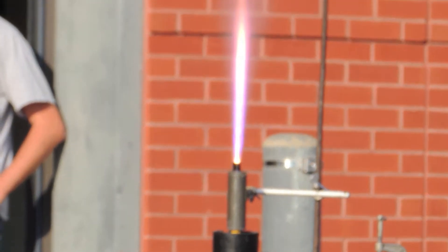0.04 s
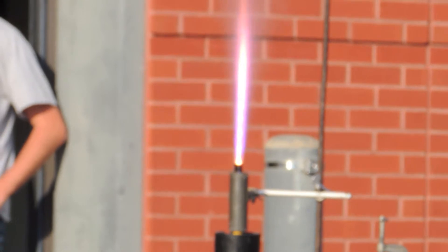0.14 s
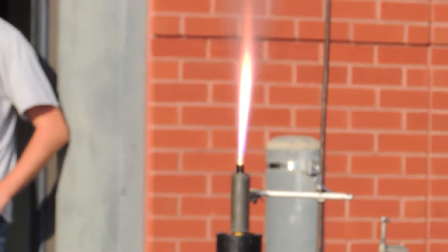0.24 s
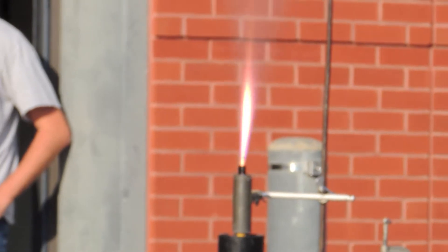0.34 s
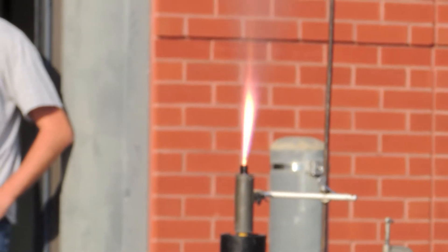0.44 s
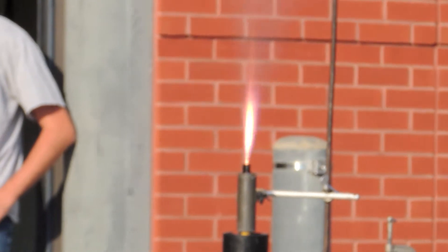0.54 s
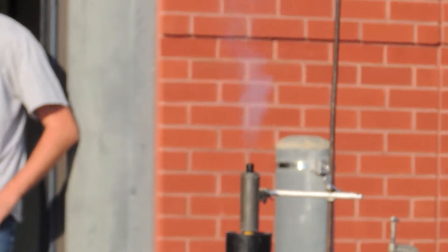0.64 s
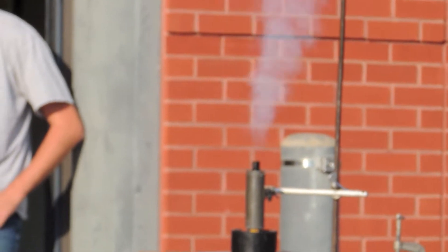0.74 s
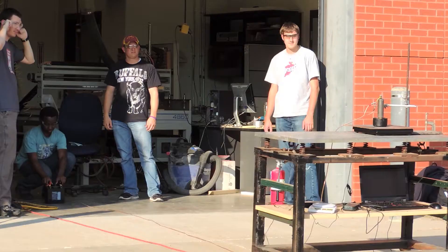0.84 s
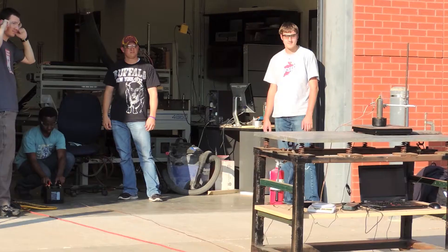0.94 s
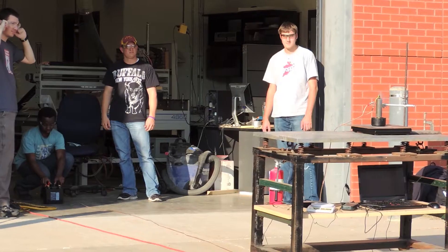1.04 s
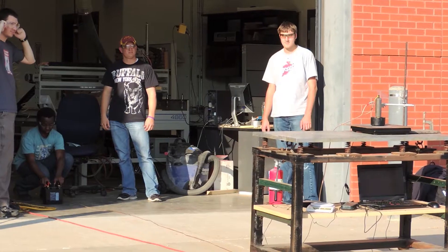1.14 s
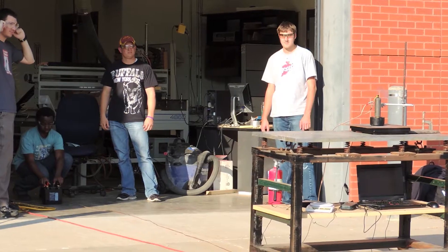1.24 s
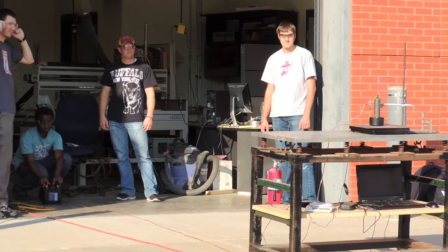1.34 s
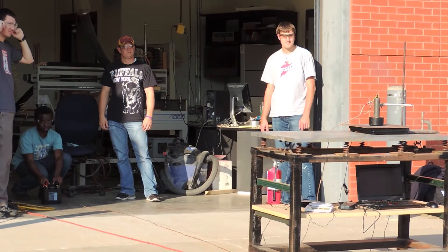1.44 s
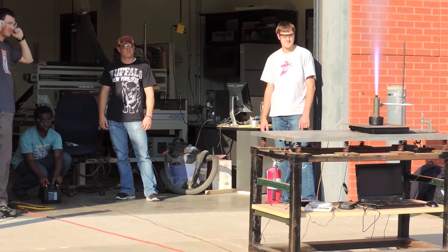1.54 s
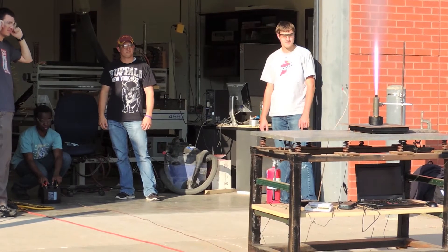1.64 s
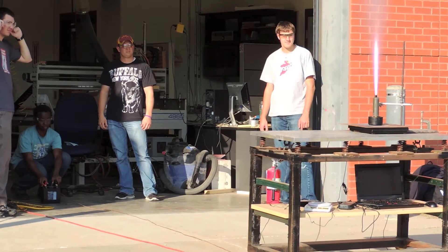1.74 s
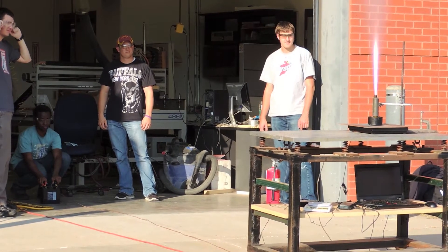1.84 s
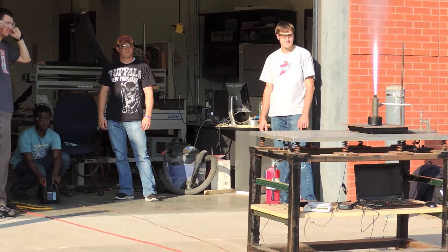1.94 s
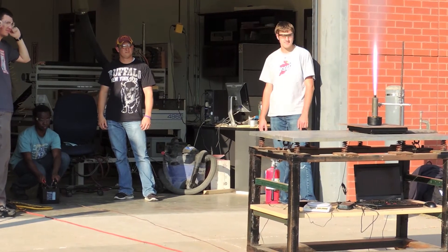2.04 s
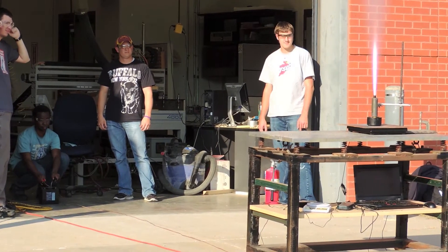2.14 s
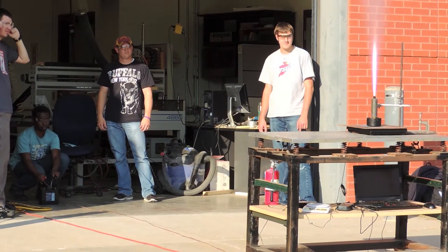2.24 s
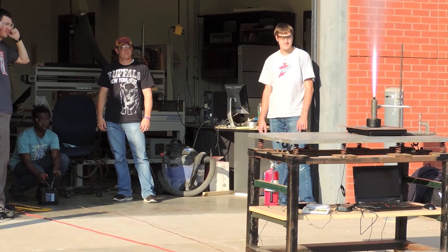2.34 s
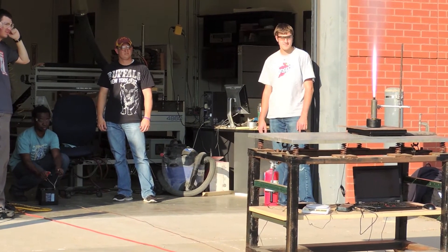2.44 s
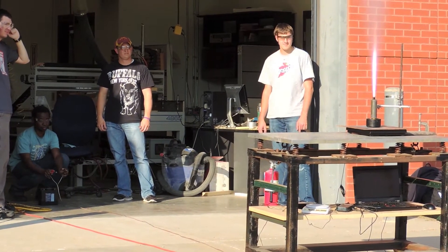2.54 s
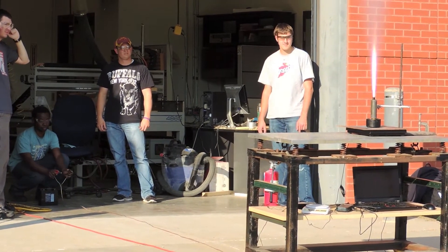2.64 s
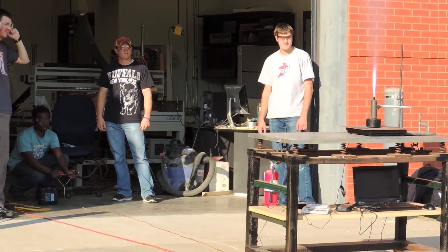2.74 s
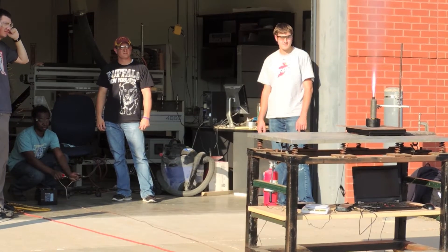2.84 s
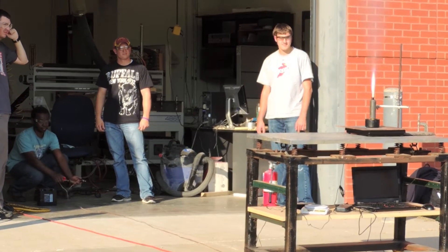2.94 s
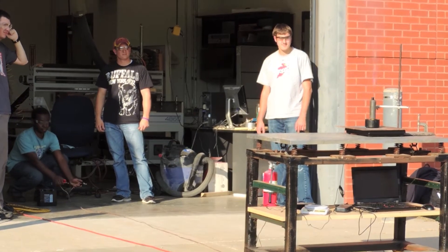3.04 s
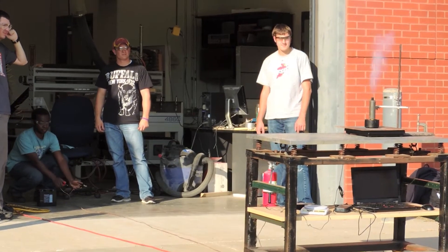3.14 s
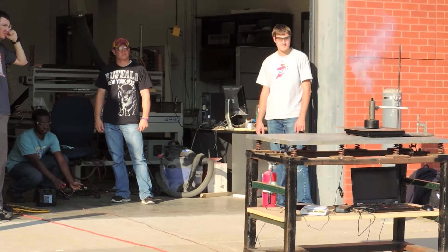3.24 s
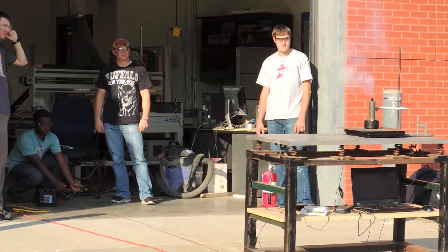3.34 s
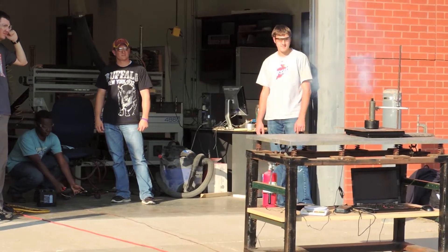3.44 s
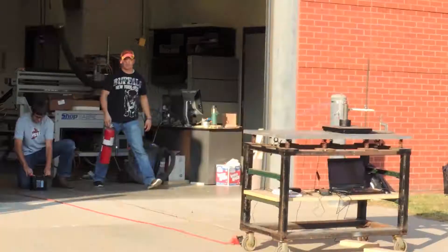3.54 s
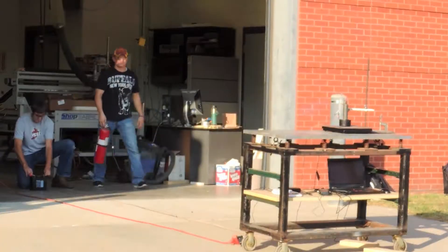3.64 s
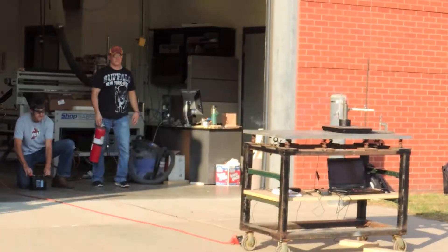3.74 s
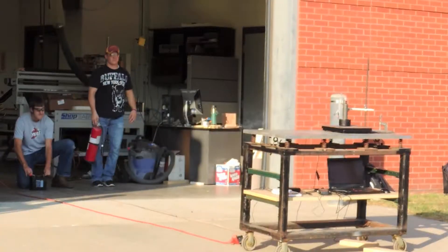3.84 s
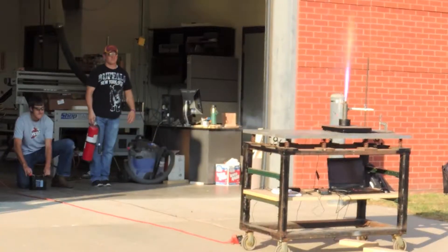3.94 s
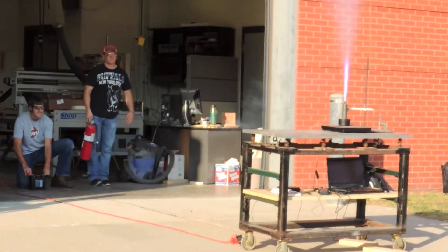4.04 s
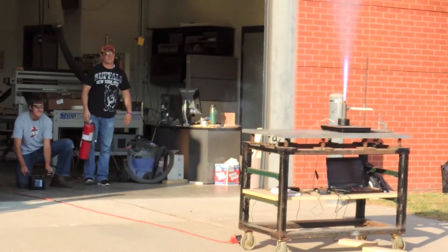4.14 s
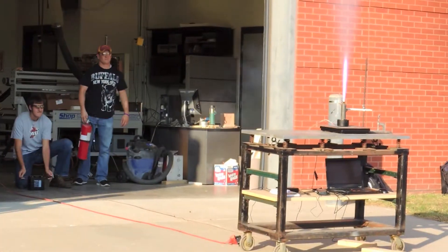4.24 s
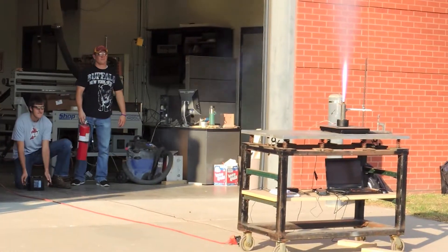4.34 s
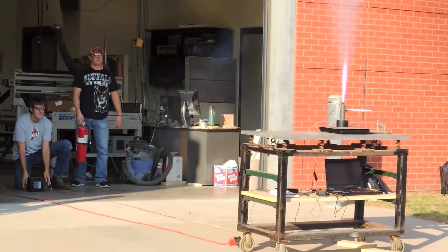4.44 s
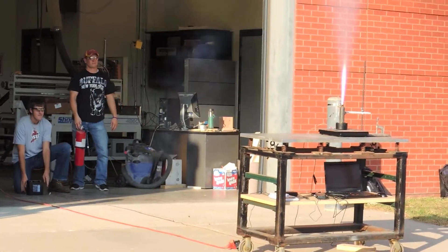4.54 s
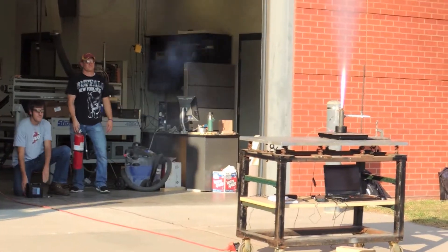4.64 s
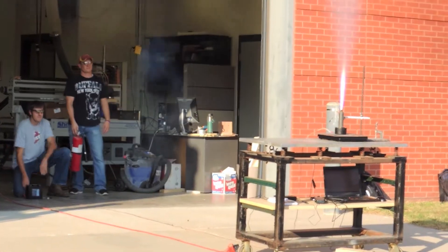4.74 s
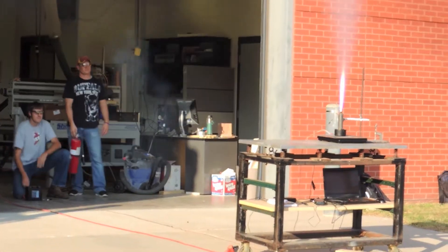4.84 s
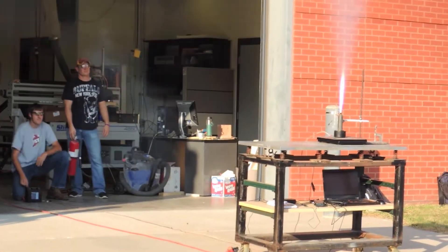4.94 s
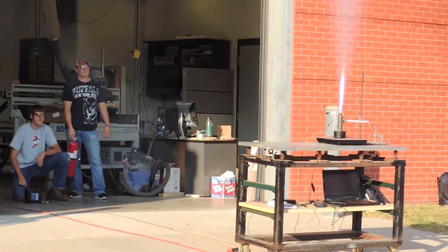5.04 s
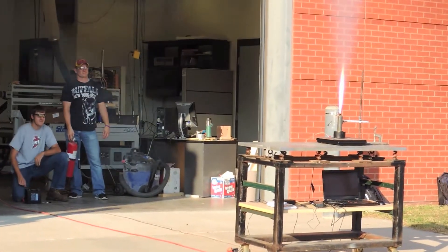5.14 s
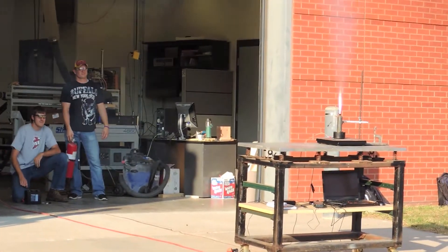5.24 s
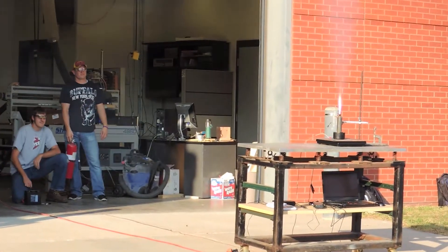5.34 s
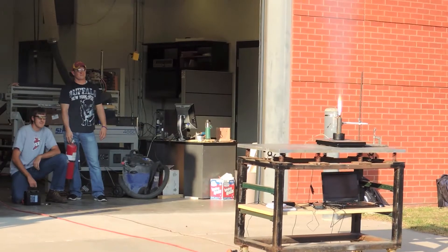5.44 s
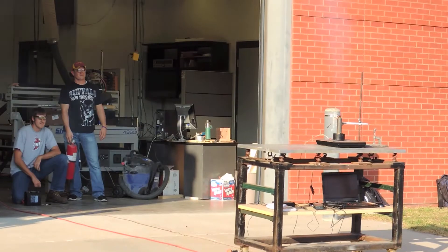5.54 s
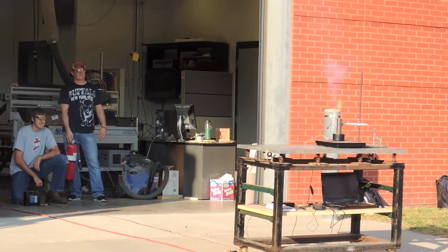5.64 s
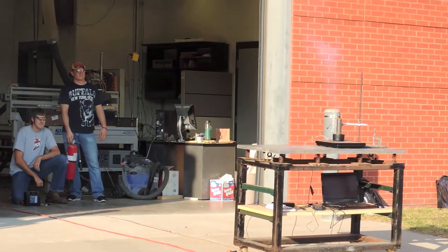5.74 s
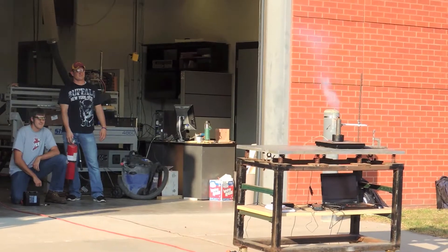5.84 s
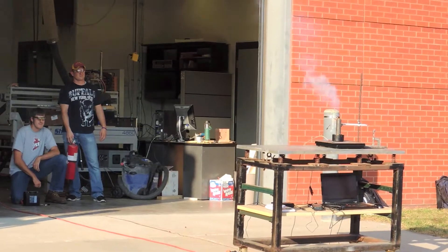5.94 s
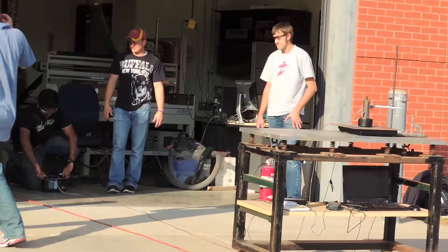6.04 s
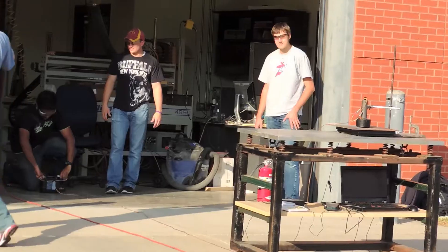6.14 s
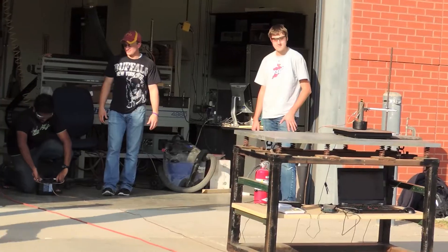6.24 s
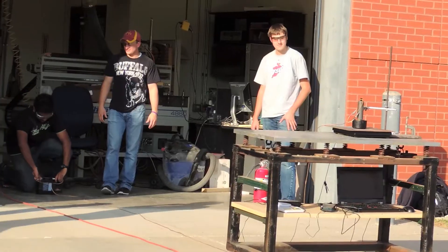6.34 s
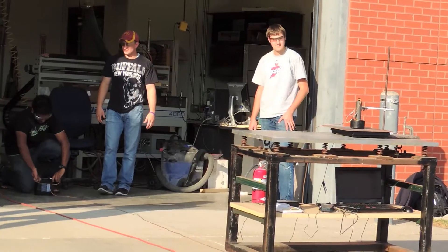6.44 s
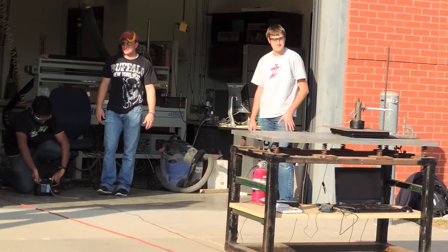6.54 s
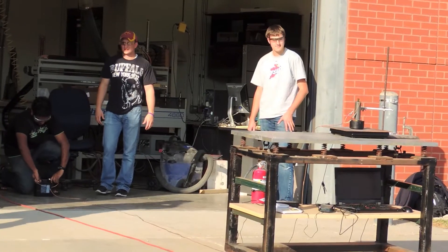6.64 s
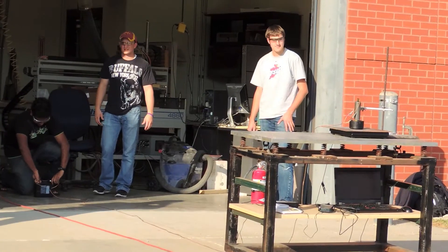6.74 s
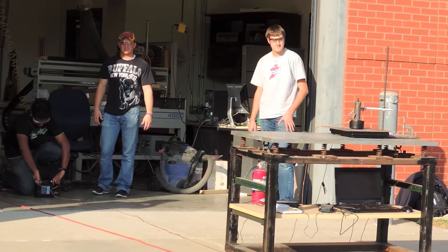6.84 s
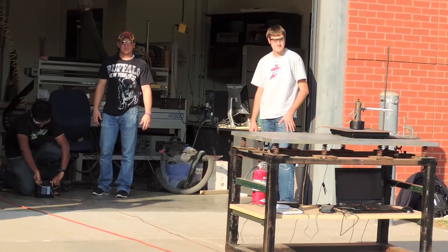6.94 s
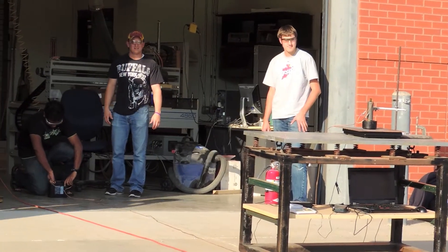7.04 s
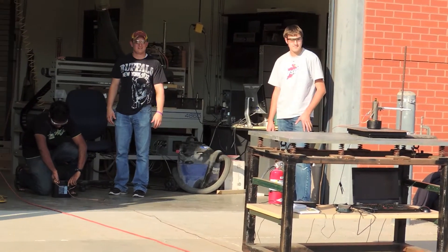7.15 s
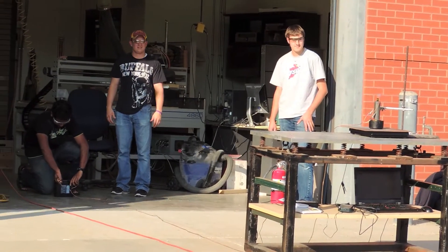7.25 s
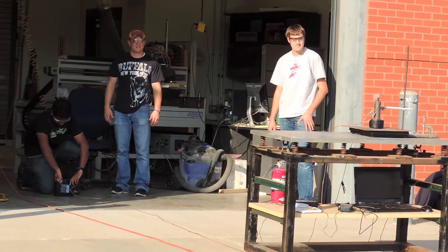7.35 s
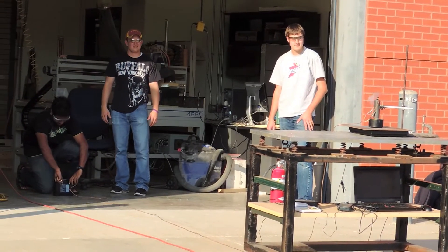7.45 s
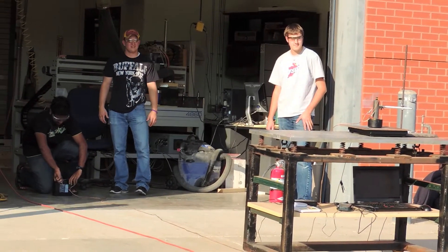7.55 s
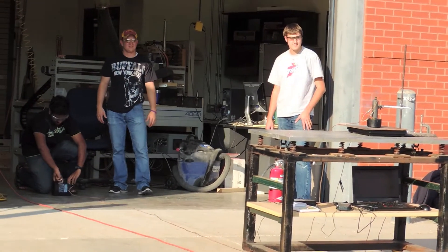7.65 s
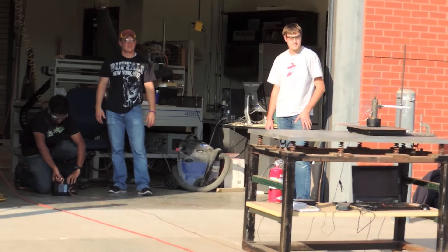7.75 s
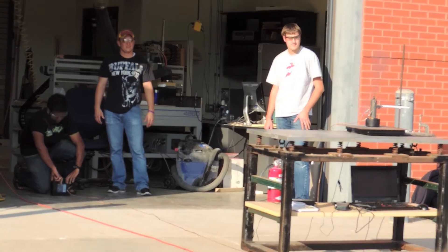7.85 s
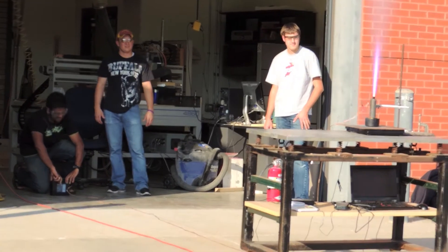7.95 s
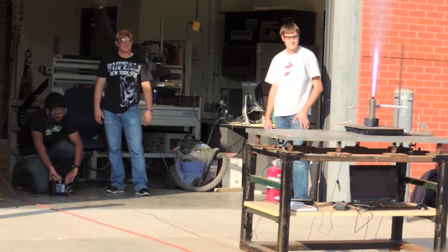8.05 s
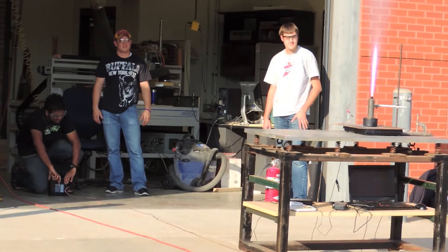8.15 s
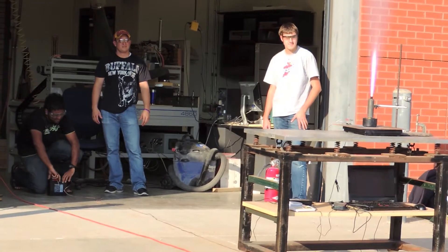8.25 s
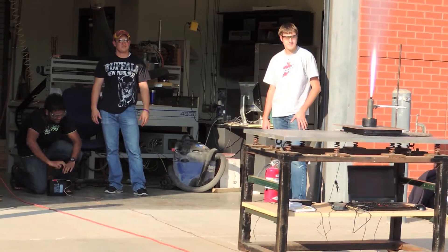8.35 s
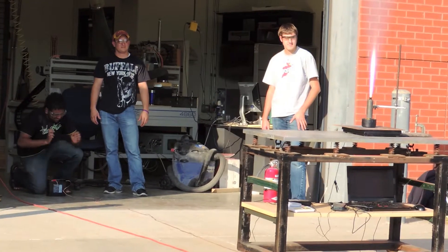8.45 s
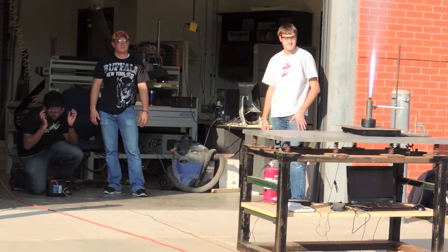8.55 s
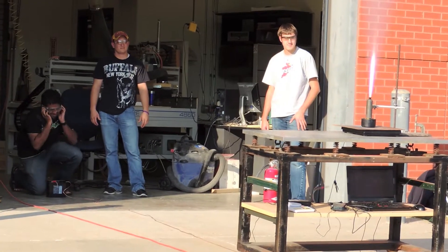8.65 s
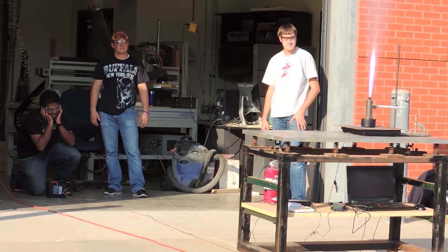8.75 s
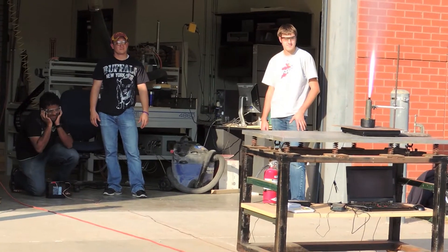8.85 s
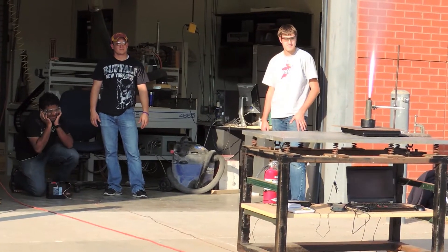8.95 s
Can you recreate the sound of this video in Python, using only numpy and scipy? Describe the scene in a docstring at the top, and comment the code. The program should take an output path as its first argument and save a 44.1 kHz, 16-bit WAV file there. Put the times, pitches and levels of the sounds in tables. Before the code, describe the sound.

Outdoors beside an open workshop, a small rocket motor is already hissing loudly, then drops off with a snap. After a short fade, quiet yard noise and wind lead to a rapid igniter hiss, a thump and an overloaded blast that ducks into steady bright hiss. Two more firings follow, the last still burning at the end. Stereo handheld microphone at some distance, with automatic gain pulling down.

```python
"""Small rocket motors on a steel bench before an open workshop: four jets in turn, joined by short fades.
The first is already burning; later ones swell from igniter hiss, thump alight and overload the input until
gain steps down. Each jet is shaped noise, partly echoing in the motor bore; the first three tail off and die
with pops, the last burns on. Filtered noise makes yard and wind, a wavering sine the drone, noise bursts the ticks."""
import sys
import numpy as np
from scipy import signal
from scipy.fft import rfft, irfft, next_fast_len
from scipy.io import wavfile
from scipy.ndimage import uniform_filter1d

SR = 44100
rng = np.random.default_rng(int(sys.argv[2]) if len(sys.argv) > 2 else 0)


def persist_wave(psi):
    """Save psi, clipped to +-1, as 16-bit WAV."""
    counts = np.round(np.clip(psi, -1, 1) * 32767).astype(np.int16)
    wavfile.write(sys.argv[1], SR, np.atleast_2d(counts).T)


N = 396459
TIME_S = np.arange(N) / SR

# Wind spectrum. Each row: frequency in Hz, relative density in dB per Hz.
WIND_SPECTRUM = [(12, -31.5), (20, 7), (97, 1), (139, -2), (197, -5), (262, -12), (300, -11), (390, -34),
                 (660, -120)]
# Gusts. Each row: centre in seconds, rise over the wind in dB.
GUSTS = [(1.15, 2), (1.47, 5), (2.35, 23), (2.45, 21.5), (3.68, 5.5), (4.08, 14), (4.51, 15), (5.21, 8)]
# Change of wind and drone once each motor is lit. One value per firing, in dB.
LOW_AFTER_LIGHT_DB = [0, 2.5, 3, -8.5]
# Surroundings. Each row, one per firing: yard level in dB, whine over it in dB, 1-4 kHz brightness in dB,
# wind level in dB, drone level in dB.
SURROUNDINGS = [(-46, -14, 2, -46, -60), (-42.5, -19, -4.5, -42, -57.5), (-41.5, -12.5, -5.5, -35, -46.5),
                (-42.5, -4.5, 0.7, -38, -35.5)]
# Yard spectrum. Each row: frequency in Hz, relative density in dB per Hz.
YARD_SPECTRUM = [(90, -33.5), (150, -8.5), (500, -10.5), (720, -11.5), (850, -9.5), (980, -11.5),
                 (1100, -14), (1300, -14), (1480, -14.5), (1700, -14.5), (2000, -17), (3090, -24),
                 (7000, -25), (14500, -35)]
# Yard likeness. Each row: frequency in Hz, left-right likeness from -1 to 1.
YARD_LIKENESS = [(60, 1), (180, 0.97), (540, 0.89), (1640, 0.41), (4940, -0.35), (14900, 0.23)]
# Faint bands in the yard noise. Each row: centre in Hz, width in Hz.
WHINE_BANDS = [(710, 40), (850, 40), (1070, 50), (1290, 50), (1660, 60)]
# Small sharp clicks nearby. Each row: start in seconds, level in dB, tail in dB against it.
TICKS = [(6.4837, -41, -8), (6.8335, -38, -6), (6.843, -33.5, -10), (6.847, -32.5, -12), (7.5094, -37, -7)]
# Ignition thumps. Each row: start in seconds, level before the band-pass in dB, pulse length in ms,
# puff in dB against the pulse, puff t60 in seconds.
THUMPS = [(1.5744, 0.5, 3.4, -6, .03), (4.0642, 0.5, 7.4, -4, .04), (7.9853, 3, 6.22, -1.5, 0.028)]
# Motor bores. Each row: start in seconds, pitch in Hz, end reflection 0-1, strongest band in Hz, its boost in dB.
BORES = [(0, 796, .5, 800, 12), (.87, 812, 0.36, 3340, 6.5), (3.58, 886, 0.37, 950, 5.5),
         (6.08, 864, 0.38, 3570, 6.5)]
# Crackles as the last propellant goes. Each row: time in seconds, impulse level before filters in dB.
POPS = [(.262, 15), (.68, -5), (3.105, -1.1), (3.111, 13.5), (5.579, -4), (5.5873, 16), (5.5907, 10),
        (5.5942, 20.5), (5.598, 3), (5.62, 1), (5.631, 0)]
# Jet spectrum. Each row: frequency in Hz, relative density in dB per Hz.
JET_SPECTRUM = [(110, -26), (590, -17), (900, -8.5), (1130, -14), (1280, -8.5), (1500, -10.5), (1700, -5),
                (1950, -10.5), (2650, -4), (4460, -4.5), (5700, -3), (6600, 0.34), (9820, -2.5),
                (14500, -2.5)]
# Jet likeness. Each row: frequency in Hz, left-right likeness from -1 to 1.
JET_LIKENESS = [(60, 0.27), (180, 0.74), (540, 0.91), (1640, 0.93), (4940, 0.55), (14900, 0.6)]
# Jet balance. Each row: frequency in Hz, left minus right in dB.
JET_BALANCE = [(60, 4.5), (120, 2), (240, 1.5), (470, 1.5), (940, 0.5), (1880, 0.5), (3750, 1),
               (7470, -1.5), (14900, 4.5)]
# Jet pan. Each row: time in seconds, left minus right in dB.
JET_PAN = [(0, 0), (.9, 0.5), (1.5, -0.2), (3.5, 0.5), (4.1, -.3), (6, 1.2), (7.8, -1.5), (9, 0)]
# Left-right difference at full blast. Each row: frequency in Hz, boost in dB.
BLAST_SIDE = [(300, 7), (1000, 12.5), (3000, -0.5), (6000, -1.3)]
# Reach of body, rumble, edge and air, one list each. Each row: frequency in Hz, weight 0-1.
COLOUR_REACH = [
    [(350, 0), (800, 1), (2200, 1), (3500, 0)],
    [(350, 1), (800, 0)],
    [(2200, 0), (3500, 1), (6000, 0)],
    [(7500, 0), (12000, 1)],
]
# Silent instants between firings, in seconds.
JOINS_S = [.872, 3.579, 6.079]
# Ignition of each motor, in seconds; negative means lit before the start.
LIGHTS_S = [-1, 1.573, 4.0645, 7.984]
# Motors. Each row: tail-off in seconds, burnout in seconds, burn level in dB, trend in dB/s, tail level in dB,
# trend in dB/s, echo against the tail in dB, whistle against the hiss in dB.
MOTORS = [(.27, 0.679, 0, 0.5, -7.5, -10.5, -12, -30), (2.728, 3.11, 3, -1.7, -10, 10, -18.5, -32.5),
          (5.26, 5.668, 3.5, -3, -6.5, 11.5, -14.5, -20.5), (9.5, 9.9, 3, -2.5, -10, 0, -16, -29.5)]
# Igniters of the last three. Each row: full at seconds, full level in dB, swell in dB/s,
# bore share (clipped to 0-1 later), then body, rumble, edge and air in dB.
IGNITERS = [(1.561, -15, 208, .86, -8.5, 3, -1, 4.5), (4.03, -15, 125, .65, 7, 8, 5, -1.1),
            (7.968, -15, 215, 0.5, -11.5, 7.4, -5, 0)]
# How much of EARLY each igniter starts with, as a factor.
EARLY_SHARES = [0, 1.1, 0.8, 1.5]
# Strength of each motor's final gasp, as a factor.
GASPS = [0.65, 1.47, .3, .6]

# Stage colours: bore share (clipped to 0-1 later), then body, rumble, edge and air in dB.
BLAST, BURN = (-0.37, 0, 8.5, -2, 2), (0, -2, -1, -2, 1.96)
TAIL, ECHO = (0.04, -3, -6.5, -3.5, -1), (.03, 7, 19, 0, -29)
# Added to the igniter colour this long before it is full, and to the tail colour by the end of the gasp.
EARLY, EARLY_S = (1, 13, 14, 4.5, -5), .2
LAST, LAST_S = (-0.04, 5.5, 3, -3.5, -2.1), 0.053
BLAST_S, BLAST_END_S, TAIL_OFF_S, FLARE_DB = 0.2, 0.072, .12, 1.5   # flare precedes tail-off
# After burnout: quick decay over a slow echo.
CUT_DB, CUT_DB_PER_S, ECHO_DB_PER_S, DULLING_S = -5, 240, 29.5, 0.31
WHISTLE_HZ, WHISTLE_WIDTH_HZ = 6590, 200
DRONE_HZ, DRONE_WAVER_HZ, DRONE_SWELL_DB = 86.3, 9.7, 3.3
GUST_S, JET_WIND_DB, BLAST_WIND_DB = 0.035, -41, 12   # the jet also buffets the ports
JOIN_OUT_S, JOIN_IN_S, JOIN_CURVE = .13, .09, 0.93
OVERLOAD_DB, FIRST_STEP_DB, FIRST_STEP_S = -4, -7.5, 0.0043
LOUD_DB, SECOND_STEP_DB, SECOND_AFTER_S, SECOND_STEP_S = -15.5, -12, .23, 0.12
INPUT_TOP = 1   # highest amplitude the input stage passes
INPUT_CUTOFF_HZ, FINAL_CUTOFF_HZ = 14170, 15477


def from_db(db):
    """Gain of a level in dB."""
    return 10 ** (np.asarray(db) / 20)


def rms_one(x):
    """Scale to rms 1."""
    return x / np.sqrt(np.mean(x ** 2) + 1e-20)


def in_time(rows):
    """Interpolate the columns after the first over time."""
    s, *columns = np.transpose(rows)
    return np.array([np.interp(TIME_S, s, c) for c in columns])


def at_hz(points, hz):
    """Read a curve on a log-frequency axis."""
    points_hz, values = np.array(points).T
    return np.interp(np.log(hz), np.log(points_hz), values)


def by_firing(values):
    """Select one value, or one run over time, for each firing."""
    return np.choose(np.searchsorted(JOINS_S, TIME_S), values)


def drift(rate_hz):
    """Slow chance of spread 1: noise at SR / 40 through a double one-pole low-pass."""
    r = np.exp(-80 * np.pi * rate_hz / SR)
    noise = rng.standard_normal(N // 40 + 2002)
    slow = signal.lfilter([1], [1, -2 * r, r * r], noise)[2000:]   # drop the filter's start-up
    return np.interp(np.arange(N) / 40, np.arange(len(slow)), rms_one(slow))


def band(x, low_hz, high_hz):
    """Band-pass."""
    return signal.sosfilt(signal.butter(2, [low_hz, high_hz], "band", fs=SR, output="sos"), x)


def noise_bands(spectrum, likeness, balance, lag_us, count=8):
    """Stereo noise of total rms 1 in overlapping bands that add up flat: pairs (centre Hz, sound)."""
    size = next_fast_len(N)
    hz = np.maximum(np.arange(size // 2 + 1) * SR / size, 1)
    noise = rfft(rng.standard_normal((2, size)))
    mid, side = noise * from_db(at_hz(spectrum, hz)) * (hz < INPUT_CUTOFF_HZ)
    alike = np.clip(at_hz(likeness, hz), -1, 1)
    pair = np.sqrt(1 + alike) * mid + np.sqrt(1 - alike) * side * [[1], [-1]]
    pair = pair * from_db(at_hz(balance, hz) * [[.5], [-.5]])
    pair[0] *= np.exp(-2j * np.pi * hz * lag_us / 1e6)   # left port is reached a little later
    pair *= size / np.sqrt(np.sum(abs(pair) ** 2))
    centres_hz = np.geomspace(spectrum[0][0], spectrum[-1][0], count)
    place = np.interp(np.log(hz), np.log(centres_hz), np.arange(count))
    bands = []
    for k, centre_hz in enumerate(centres_hz):
        weight = np.clip(1 - abs(place - k), 0, 1)
        bands.append((centre_hz, irfft(pair * weight, size)[:, :N]))
    return bands


def thrust():
    """Hiss level in dB, stage colours and blast weight, from igniter through burn and tail-off to echo."""
    t, levels, stages, blast = TIME_S, [], [], 0
    igniters = [(-2, -99, 99) + BURN] + IGNITERS   # the first motor is already lit
    for lit, early, gasp, motor, igniter in zip(LIGHTS_S, EARLY_SHARES, GASPS, MOTORS, igniters):
        full, full_db, swell_db_per_s, *colour = igniter
        off, out, burn_db, burn_trend, tail_db, tail_trend, echo_db = motor[:-1]
        tail = off + TAIL_OFF_S
        late_db = burn_db + burn_trend * (off - lit)
        last_db = tail_db + tail_trend * (out - tail)
        lit_db = np.interp(t, [lit, off - .15, off, tail, out],
                           [burn_db, late_db, late_db + FLARE_DB, tail_db, last_db])
        swell_db = full_db - swell_db_per_s * np.maximum(full - t, 0)
        since_s = np.maximum(t - out, 0)
        cut = from_db(CUT_DB - CUT_DB_PER_S * since_s)
        echo = from_db(echo_db - ECHO_DB_PER_S * since_s)
        after_db = last_db + 20 * np.log10(np.hypot(cut, echo))
        levels.append(np.select([t < lit, t > out], [swell_db, after_db], lit_db))

        strike, blast_end = lit - .004, lit + BLAST_S
        settled = blast_end + BLAST_END_S
        early_colour = colour + early * np.array(EARLY)
        gasp_colour = TAIL + gasp * np.array(LAST)
        stages.append(in_time([
            (full - EARLY_S, *early_colour), (full, *colour), (strike, *colour),
            (lit, *BLAST), (blast_end, *BLAST), (settled, *BURN), (off, *BURN),
            (tail, *TAIL), (out - LAST_S, *TAIL), (out, *gasp_colour), (out + DULLING_S, *ECHO)]))
        blast = blast + np.interp(t, [strike, lit, blast_end, settled], [0, 1, 1, 0])
    return by_firing(levels), by_firing(stages), blast


def low_sound():
    """Lumpy wind, partly its own at each port, and a wavering drone that both ports share."""
    bands = noise_bands(WIND_SPECTRUM, [(30, 0.53), (200, 0.83)], [(30, 3.0), (200, 2.7)], lag_us=0, count=3)
    lumpy = sum(sound * from_db(5.0 * drift(3.8)) for _, sound in bands)
    drone_hz = DRONE_HZ + DRONE_WAVER_HZ * drift(12)
    drone = np.sqrt(2) * np.sin(2 * np.pi * np.cumsum(drone_hz) / SR)
    after_db = by_firing(LOW_AFTER_LIGHT_DB) * (TIME_S > by_firing(LIGHTS_S))
    wind_db, drone_db = [by_firing(db) + after_db for db in np.transpose(SURROUNDINGS)[3:]]
    wind_db = wind_db + sum(db * np.exp(-((TIME_S - s) / GUST_S) ** 2) for s, db in GUSTS)
    hiss_db, _, blast = thrust()
    buffet_db = hiss_db + JET_WIND_DB + BLAST_WIND_DB * blast
    wind = np.hypot(from_db(wind_db), from_db(buffet_db)) * rms_one(lumpy)
    return wind + from_db(drone_db + DRONE_SWELL_DB * drift(15)) * drone


def yard():
    """Far traffic and workshop noise: slightly patchy broad noise plus faint fluctuating narrow bands."""
    bands = noise_bands(YARD_SPECTRUM, YARD_LIKENESS, [(100, 0.82), (10000, .8)], lag_us=0, count=6)
    level_db, whine_db, bright_db = map(by_firing, np.transpose(SURROUNDINGS)[:3])
    whine = 0
    for hz, width_hz in WHINE_BANDS:
        narrow = band(rng.standard_normal((2, N)), hz - width_hz / 2, hz + width_hz / 2)
        whine = whine + rms_one(narrow) * from_db(4.7 * drift(4.0) - 10.5)
    noise = sum(sound * from_db(1.2 * drift(9) + bright_db * (1000 < hz < 4000)) for hz, sound in bands)
    return from_db(level_db) * (noise + from_db(whine_db) * whine)


def ticks():
    """Noise bursts: a brief crack with a short scattered tail."""
    out, t = np.zeros((2, N + SR)), np.arange(SR // 4) / SR
    for s, level_db, tail_db in TICKS:
        first = round(s * SR)
        shape = from_db(2 - t / 1.5e-4) + from_db(tail_db - t / 0.0019)
        out[:, first:first + len(t)] += from_db(level_db) * shape * rng.standard_normal((2, len(t)))
    return band(out[:, :N], 700, 8700)


def thumps():
    """An N-shaped pressure pulse and a dull puff of gas, its own at each port, that dies fast."""
    out, t = np.zeros((2, N + SR)), np.arange(SR // 2) / SR
    for s, level_db, pulse_ms, puff_db, t60_s in THUMPS:
        first = round(s * SR)
        pulse = np.where(t < pulse_ms / 1e3, 2e3 * t / pulse_ms - 1, 0)
        puff = rms_one(band(rng.standard_normal((2, len(t))), 120, 2200))
        puff = puff * from_db(puff_db - 60 * t / max(t60_s, .005))
        out[:, first:first + len(t)] += from_db(level_db) * (pulse + puff)
    return band(out[:, :N], 70, 3000)


def bore_echo(x):
    """Sound echoing back and forth along each motor's bore: a comb of modes plus one strong band."""
    out = np.zeros(x.shape)
    ends_s = [row[0] for row in BORES[1:]] + [N / SR]
    for (s, pitch_hz, reflect, strong_hz, strong_db), end_s in zip(BORES, ends_s):
        span = slice(round(s * SR), round(end_s * SR))
        part = x[..., span]
        size = next_fast_len(part.shape[-1] + 2000)
        hz = np.arange(size // 2 + 1) * SR / size
        reflect = min(reflect, .9)
        pipe = np.sqrt(1 - reflect ** 2) / (1 - reflect * np.exp(-2j * np.pi * hz / pitch_hz))
        # no ring below the first mode
        pipe = np.where(hz < pitch_hz / 2, np.sqrt((1 - reflect) / (1 + reflect)), pipe)
        pipe *= from_db(strong_db * np.exp(-((hz - strong_hz) / 250) ** 2))
        out[..., span] = irfft(rfft(part, size) * pipe, size)[..., :part.shape[-1]]
    return out


def pops():
    """Sharp snaps, band-passed impulses, that ring the bore."""
    clicks = np.zeros(N)
    clicks[[round(s * SR) for s, _ in POPS]] = -from_db(np.array(POPS)[:, 1])
    return bore_echo(band(clicks, 350, 7000))


def jets():
    """Turbulent jet noise with a faint nozzle whistle; its colour shifts as chamber pressure changes."""
    hiss_db, (share, *colours_db), blast = thrust()
    sputter_db = 0.66 * drift(3.4)   # uneven burning shakes all bands together
    out = 0
    for hz, sound in noise_bands(JET_SPECTRUM, JET_LIKENESS, JET_BALANCE, lag_us=9.8, count=9):
        weights = np.array([at_hz(reach, hz) for reach in COLOUR_REACH])
        colour_db = weights @ colours_db
        # the ports disagree more at full blast
        extra_side = (sound[0] - sound[1]) / 2 * (from_db(blast * at_hz(BLAST_SIDE, hz)) - 1)
        band_db = colour_db + sputter_db + 0.85 * drift(29)
        out = out + (sound + extra_side * [[1], [-1]]) * from_db(band_db)
    half_hz = WHISTLE_WIDTH_HZ / 2
    whistle = rms_one(band(rng.standard_normal(N), WHISTLE_HZ - half_hz, WHISTLE_HZ + half_hz))
    out = out + whistle * from_db(by_firing(np.array(MOTORS)[:, -1])) * (1 - blast)
    out = out * from_db(hiss_db + in_time(JET_PAN)[0] * [[.5], [-.5]])
    share = np.clip(share, 0, 1)
    return (1 - share) * out + share * from_db(1.0) * bore_echo(out)


def scene():
    """Surroundings, then the motors on the bench."""
    return low_sound() + yard() + ticks() + thumps() + pops() + jets()


def gain_control(x):
    """Per firing, gain drops at overload and again a while after the sound grew loud."""
    steps_db = []
    level = np.sqrt(uniform_filter1d(np.mean(x ** 2, axis=0), size=256) + 1e-12)
    for start_s in [0] + JOINS_S:
        heard = level[round(start_s * SR):]
        # -1: a loud opening finds the gain already down
        over_s, loud_s = [start_s + np.argmax(heard > from_db(db)) / SR or -1 for db in (OVERLOAD_DB, LOUD_DB)]
        first = np.clip((TIME_S - over_s) / FIRST_STEP_S, 0, 1)
        second = np.clip((TIME_S - loud_s - SECOND_AFTER_S) / SECOND_STEP_S, 0, 1)
        steps_db.append(FIRST_STEP_DB * first + SECOND_STEP_DB * second)
    return x * from_db(by_firing(steps_db))


def fades():
    """Gain that falls to silence at each join and rises after it."""
    gain = 1
    for s in JOINS_S:
        ramp = np.maximum((s - TIME_S) / JOIN_OUT_S, (TIME_S - s) / JOIN_IN_S)
        gain = gain * np.clip(ramp, 0, 1) ** JOIN_CURVE
    return gain


def cut_top(x, cutoff_hz):
    """Steep elliptic low-pass."""
    return signal.sosfilt(signal.ellip(10, .3, 70, cutoff_hz, fs=SR, output="sos"), x)


def record(dry):
    """Gain control, input overload, top cut, flat clipping of overshoot, fades, second top cut."""
    heard = np.clip(gain_control(dry), -INPUT_TOP, INPUT_TOP)
    heard = cut_top(heard, INPUT_CUTOFF_HZ)
    heard = np.clip(heard, -1, 1) * fades()
    return cut_top(heard, FINAL_CUTOFF_HZ)


dry = scene()
out = record(dry)
persist_wave(out)
```